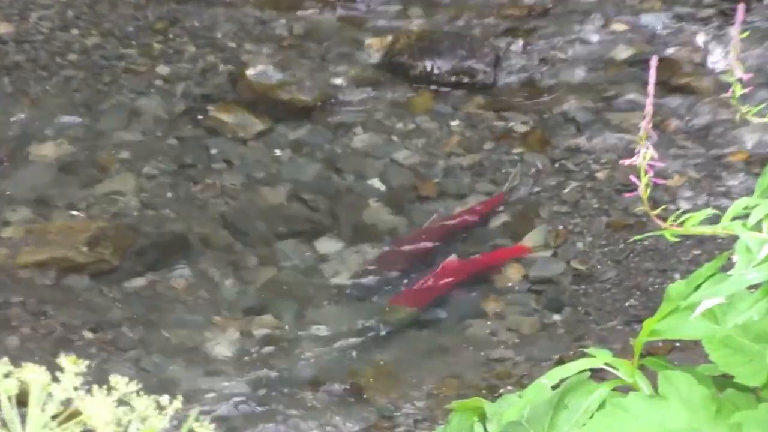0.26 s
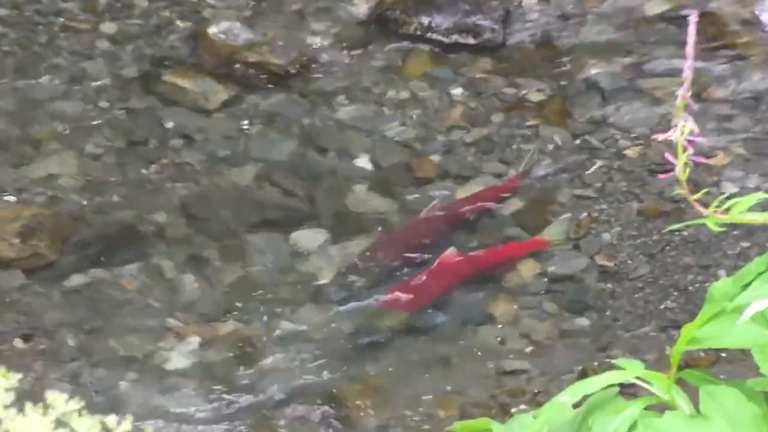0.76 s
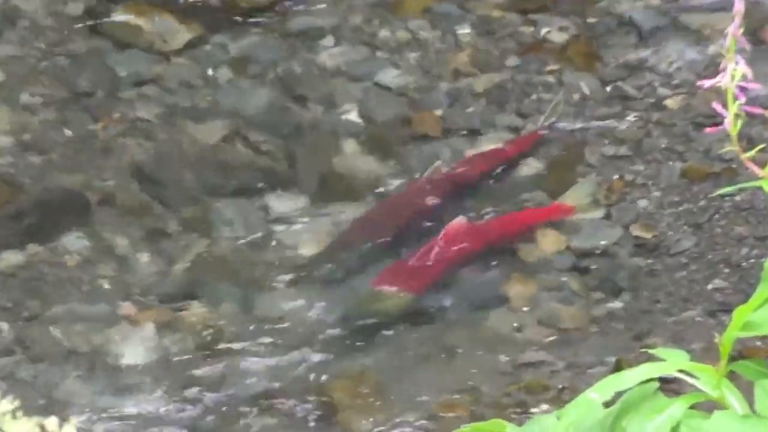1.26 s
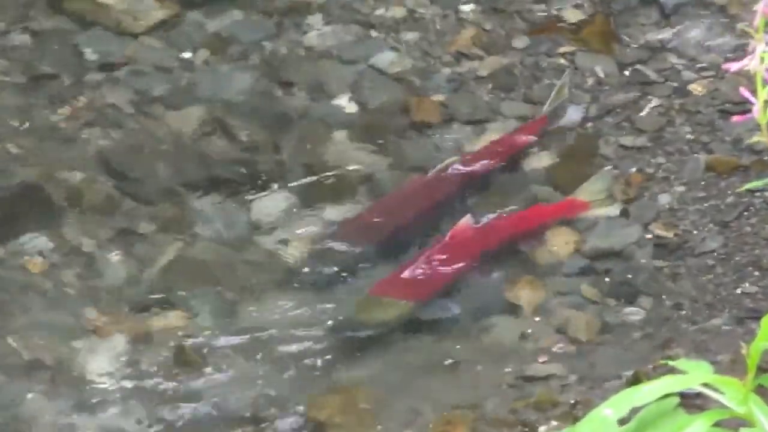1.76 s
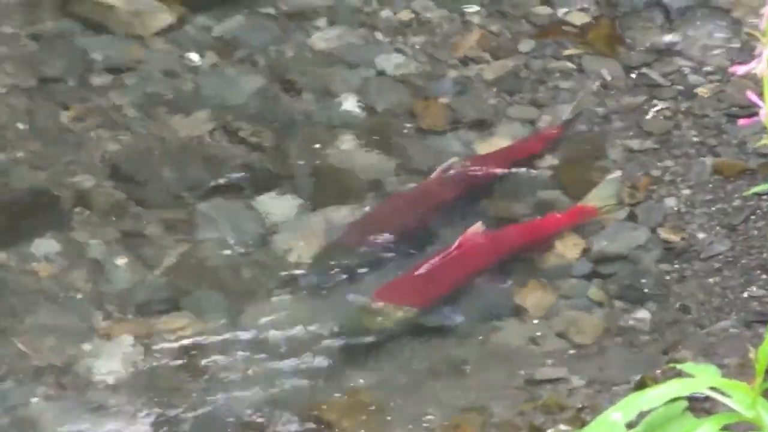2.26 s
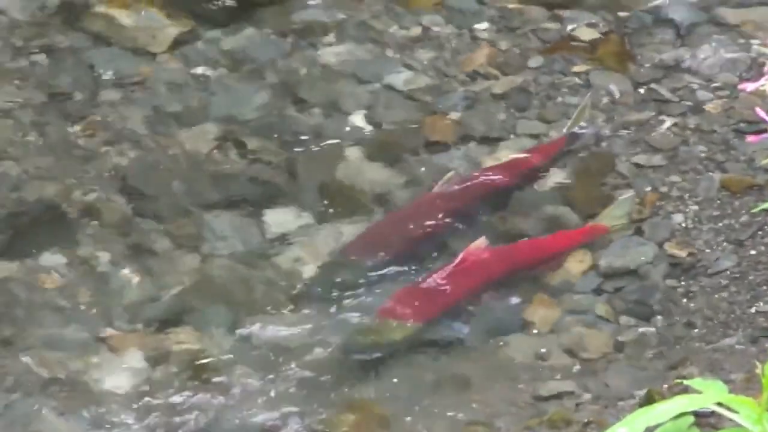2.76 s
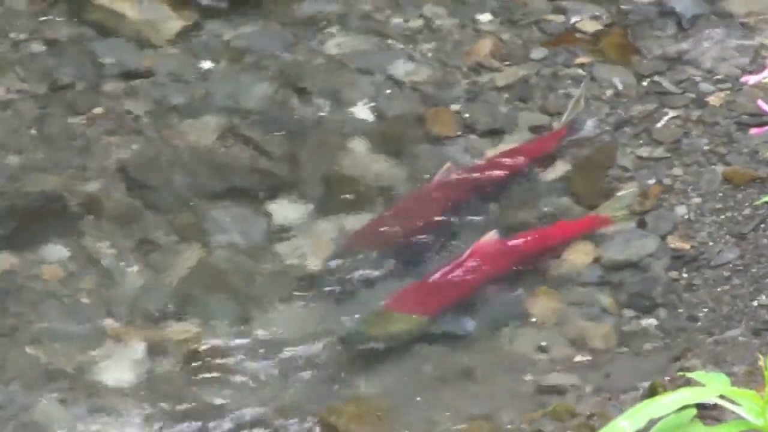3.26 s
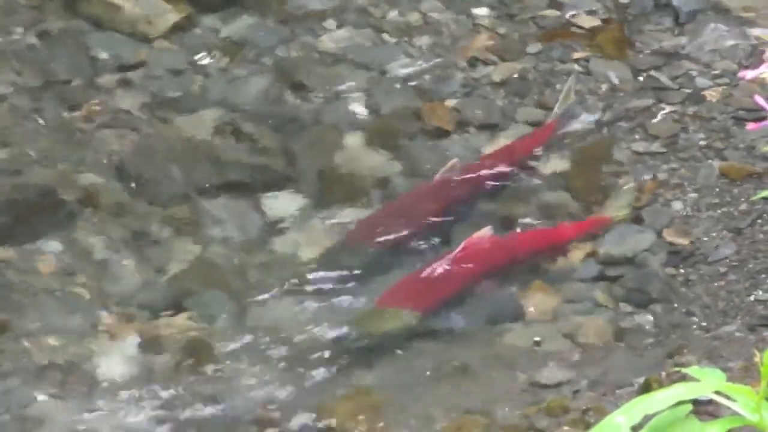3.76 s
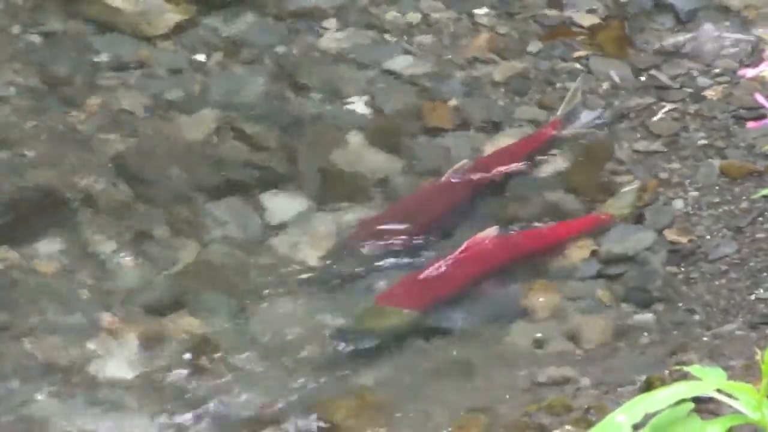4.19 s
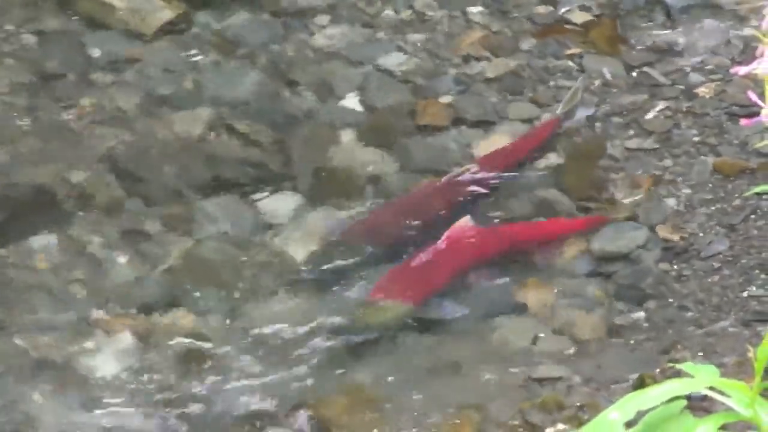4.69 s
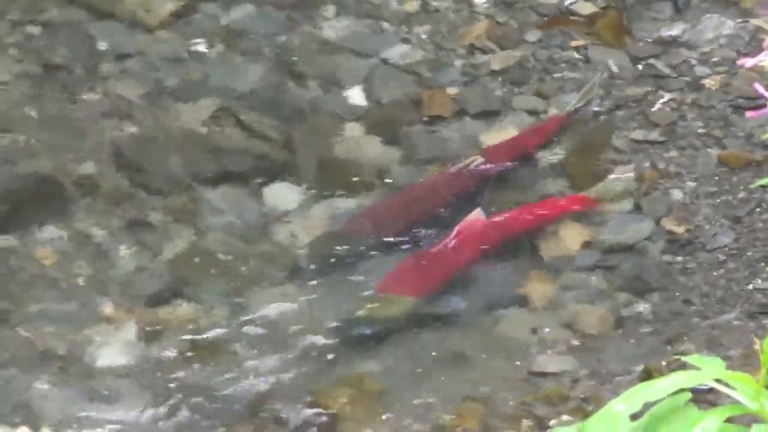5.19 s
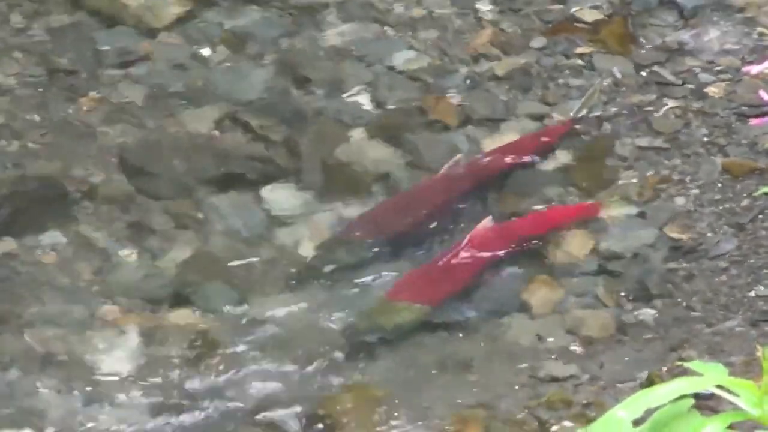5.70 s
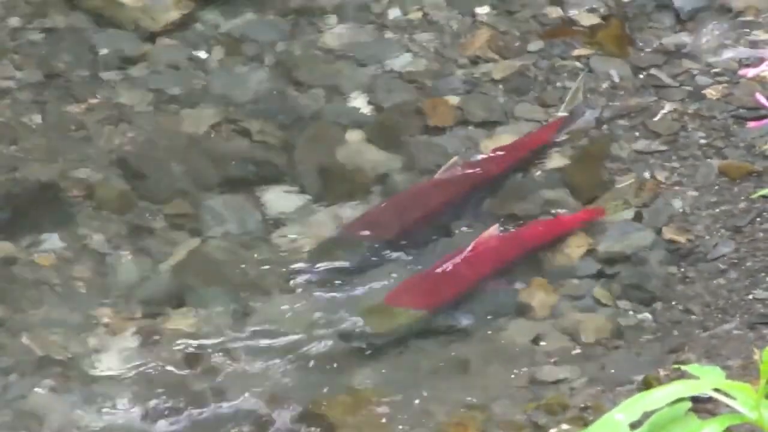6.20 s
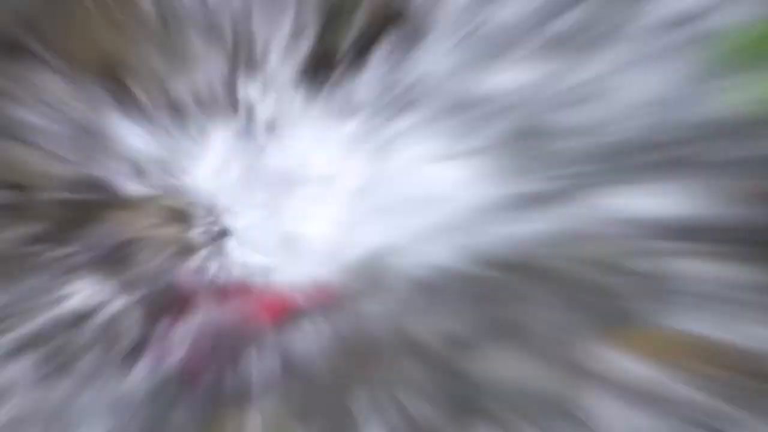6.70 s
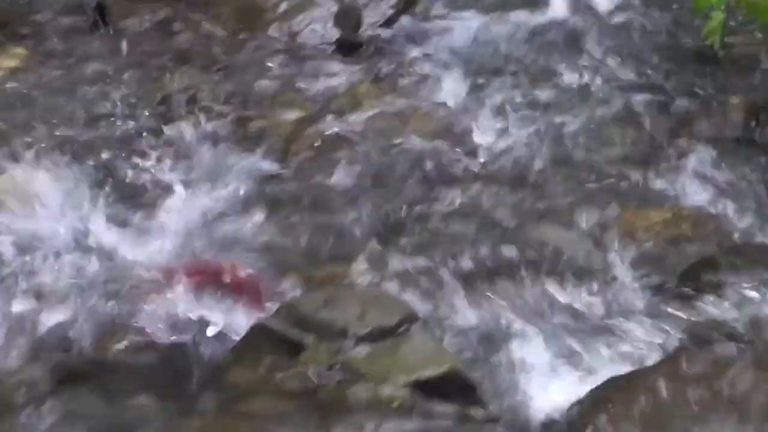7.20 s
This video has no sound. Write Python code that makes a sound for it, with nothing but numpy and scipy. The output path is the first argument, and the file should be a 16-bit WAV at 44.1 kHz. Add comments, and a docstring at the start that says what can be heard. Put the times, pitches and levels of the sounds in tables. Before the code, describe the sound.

From 0 s a shallow creek rushes over stones: a broad, steady mid-range wash with burbling bubbles and a light fizz. Soft, short gulps come irregularly until about 3.3 s, with a few faint drops and a crisper tick near 1.1 s. Faint road noise on the right emerges early and grows gradually, with slight swaying, a blurred tyre hum and a low engine drone. The first vehicle passes at about 5.4 s, its hum sinking in pitch amid rough bursts of roar; the second follows at about 6.2 s with brighter tread hiss, as the traffic sweeps left. Between 6.4 and 6.9 s this blends swiftly into white water, fuller and more churning, without traffic. Close bubbling gulps start around 6.85 s and crowd together from 7.17 s with sharp splashes and spray until the end, about 7.4 s. Wide outdoor stereo, with slightly dulled treble.

```python
"""One first hears a shallow creek over stones; two vehicles approach on a road and their tyre roar swells over it.
The sound then cross-fades to white water in the same creek, with gulps and splashes close by.
Water is turbulent noise plus swarms of ringing bubbles; gulps are runs of air pockets, splashes noise bursts.
Traffic is coloured noise, tyre song and engine drone, shaped by distance and bearing.
Three narrow bands are notched from the treble, and the whole is band-limited."""
import sys
import numpy as np
from scipy import signal
from scipy.fft import rfft, irfft, next_fast_len
from scipy.io import wavfile
from scipy.ndimage import uniform_filter1d, map_coordinates

SR = 44100
rng = np.random.default_rng(int(sys.argv[2]) if len(sys.argv) > 2 else 0)


def master_out(mix):
    """Clip the mix to full scale and print it as 16-bit PCM to the path in sys.argv[1]."""
    frames = np.transpose(np.atleast_2d(mix))
    ceiling = np.clip(frames, -1, 1)
    pcm = np.round(ceiling * 32767).astype(np.int16)
    wavfile.write(sys.argv[1], SR, pcm)


N = 328545  # samples

# Spectra of the two waters: [f/Hz, relative level/dB]
SHALLOWS_SPECTRUM = [(30, -55), (70, -43), (120, -20.5), (180, -8.5), (240, -10.5), (400, -5.5),
                     (780, -1.5), (1400, -3), (2200, -9.5), (3500, -19), (4500, -20), (6000, -17.5),
                     (8500, -22.5), (10300, -28.5), (11300, -40)]
RAPIDS_SPECTRUM = [(30, -49), (90, -41), (180, -13), (240, -13), (340, -5), (820, 0.6), (1100, -3.5),
                   (1550, -2), (2300, -6.5), (3500, -17), (4500, -18), (6500, -16.5), (9500, -22.5),
                   (11300, -32.5)]
# Likeness of left and right: [f/Hz, coherence]
SHALLOWS_COHERENCE = [(60, 0.98), (200, 0.91), (500, 0.97), (900, 0.94), (1600, 0.84), (2500, 0.91),
                      (3300, 0.73), (6000, 0.53), (10800, 0.33)]
RAPIDS_COHERENCE = [(60, .6), (200, .96), (800, .98), (2300, .92), (3300, .72), (6500, 0.63), (10800, .42)]
ROAD_COHERENCE = [(60, 0.95), (200, 1), (700, .99), (1100, 0.95), (1900, 0.94), (3400, 0.61), (6000, 0.37),
                  (9000, 0.22)]
# Phase by which the shallows reach the left first: [f/Hz, phase/rad]
SHALLOWS_LEAD = [(100, -.07), (1100, -.3), (2000, -.06), (6500, .2)]
# Water folding over a stone and trapping a cluster of air pockets:
# [t/s, mid-range f/Hz, level/dB, length/s, range of pitch/octave]
GULP_EVENTS = [(0.567, 675, -32.5, 0.031, 0.33), (1.228, 1090, -36, 0.035, 0.3),
               (1.531, 800, -32.5, .06, 1.43), (1.931, 900, -31.5, 0.028, 1.5), (2.249, 530, -33, .07, 0.4),
               (2.626, 700, -29.5, 0.039, 1.15), (2.826, 860, -30.5, 0.049, 0.31),
               (3.27, 1200, -32, .03, .3), (6.85, 1330, -28, .015, 0.2), (6.955, 1473, -27.5, 0.019, 0.12),
               (7.17, 794, -24.5, .02, 0.35), (7.22, 1164, -28.5, .035, 0.91),
               (7.236, 1660, -29, 0.021, .15), (7.342, 760, -28.5, .035, 0.55),
               (7.356, 1090, -29, 0.027, 0.3), (7.43, 880, -31, 0.021, 0.54)]
# Drops and spray hitting stone: [t/s, level before the band filter/dB, 60 dB decay time/s, upper f/Hz]
SPLASH_EVENTS = [(0.552, -35, .012, 9000), (1.0972, -17.5, 0.0052, 7800), (1.5125, -29, .007, 9000),
                 (1.866, -31, .007, 9000), (1.8906, -32, .007, 9000), (2.7614, -28.5, .03, 4800),
                 (3.9515, -34, .012, 9500), (5.3033, -25, .015, 6505), (7.166, -20.5, 0.017, 10200),
                 (7.173, -24.5, 0.03, 9000), (7.18, -34, 0.18, 9900), (7.235, -35, 0.13, 10000),
                 (7.3305, -26, .009, 10500)]
# Vehicles: [t when level with the listener/s, closest distance/m,
# then peak level/dB of rumble, tyre roar, tread hiss and sizzle, before the sway]
VEHICLES = [(5.399, 12.22, -28.5, -18.5, -31, -40), (6.201, 9.8, -30.5, -45, -21.5, -44)]
# Spectra of the road noise: [f/Hz, relative level/dB]
RUMBLE_SPECTRUM = [(30, -54), (45, -53), (62, -37), (90, -28), (125, -14.5), (170, -3.5), (200, 0.5),
                   (235, -0.5), (285, 4), (420, 3), (800, -21.5), (2000, -68)]
ROAR_SPECTRUM = [(150, -42.5), (300, -13.5), (450, -3), (600, 0.5), (700, 0), (810, 2), (960, -6.5),
                 (1250, -5.5), (2000, -27.5), (2700, -37), (4000, -56)]
TREAD_SPECTRUM = [(100, -71), (400, -40), (800, -9), (950, 6), (1350, 1.5), (1800, -2), (2400, -9.5),
                  (3500, -28.5), (4500, -31), (6300, -32.5), (12000, -67)]
# Air squeezed from the tread, heard only at close range: [f/Hz, relative level/dB]
SIZZLE_SPECTRUM = [(2000, -16), (3400, 3), (4500, -0.5), (6300, 1), (8000, -5), (9500, -9.5), (11500, -35)]
# Gain of the road noise, which emerges, then swells and ebbs: [t/s, rumble level/dB, tyre level/dB]
ROAD_SWAY = [(0, -12, -7), (.5, -2, -2), (1.3, -3, 1), (1.85, -1.5, -0.8), (2.3, 3.5, -0.5),
             (3.05, -2, -0.5), (3.7, 0.5, 1), (4.1, -0.5, -1.3), (4.45, -0.5, 0.5), (4.7, -0.5, -0.2),
             (5.12, 3, 1), (5.38, -1.5, -1), (5.65, -1.5, 0.7), (6.0, -2, 0.5), (6.3, 0, 0),
             (6.55, -3.5, -1.5)]
# Tyre song, one curve each for the leading and following vehicle:
# [t/s, f before the wander/Hz, level before the sway/dB]
TYRE_SONGS = [
    [(0, 779, -48), (2.5, 779.3, -38.5), (4.3, 788.4, -35.5), (4.85, 790, -28), (5.22, 795, -24.5),
     (5.48, 693.5, -25), (5.68, 600, -26.5), (5.95, 571, -31.5), (6.5, 560, -49)],
    [(0, 901, -55), (5.4, 899.5, -35.5), (5.75, 890, -30), (6.1, 871, -26), (6.3, 848, -24),
     (6.5, 870, -23), (6.8, 856, -34)],
]
# Brief surges of the tyre roar: [t/s, centre f/Hz, peak level before the sway/dB, half length/s]
ROAR_SURGES = [(5.19, 800, -21, 0.027), (5.318, 720, -22, .012), (5.55, 562, -20, 0.026),
               (5.71, 1000, -20, 0.023), (5.782, 800, -21, 0.022), (6.312, 820, -20, .025),
               (6.475, 848, -20, 0.019)]
# Bearing of the traffic: [t/s, sine of the angle (-1 right, 1 left)]
TRAFFIC_BEARING = [(0, -0.58), (4.3, -0.64), (5.8, 0.85), (6.5, 0.95)]
# Treble notches, a wide and a narrow one in series for each band: [f/Hz, width/Hz]
TREBLE_NOTCHES = [(3015, 1200), (3020, 130), (4015, 1300), (4020, 220), (5020, 1200), (5030, 450)]

TOP_HZ = 11300  # band limit
SPEED_M_PER_S, SOUND_M_PER_S = 18.1, 343  # of the vehicles and of sound
FIRING_HZ = 89  # leading vehicle's engine, before Doppler shift and wander
SONG_WANDER = .028  # share by which an uneven road bends the tyres' pitch
POCKET_CYCLES = 7.3  # cycles in which an air pocket's ring decays by exp(-2)
CROSSFADE_START_S, CROSSFADE_LENGTH_S = 6.423, 0.44


def shallows():
    """Turbulence and bubble resonance: a wash, deep and light bubbles surging separately, and a fine fizz."""
    wash = turbulence(patchy_db=0.84)
    burble_gain = amp(-14.5 + 1.5 * wobble(11))
    burble = burble_gain * bubbles(190, 385.0, 908.5, cycles=19.0, spread_db=0.5, size=1600)
    babble_gain = amp(-15.0 + 1.4 * wobble(14))
    babble = babble_gain * bubbles(480, 854, 2310, cycles=16.0, spread_db=1.0, size=900)
    fizz_gain = amp(-9.0 + 0.91 * wobble(11))
    fizz = fizz_gain * bubbles(1500, 3100, 10850, cycles=22, spread_db=0.5, size=240)
    mix = wash + burble + babble + fizz
    water = amp(-33.5) * spread(mix, SHALLOWS_SPECTRUM, SHALLOWS_COHERENCE)
    opposite = np.array([[1], [-1]])  # left leads by half the phase, right lags by half
    return filtered(water, lambda hz: np.exp(.5j * along(SHALLOWS_LEAD, hz) * opposite))


def rapids():
    """Air entrainment: white water churns air into many more bubbles, with spray above on the same surge."""
    wash = turbulence(patchy_db=0.5)
    surge_db = wobble(13)
    churn = amp(-13.5 + surge_db) * bubbles(900, 447, 2234, cycles=10.7, spread_db=1.2, size=700)
    spray = amp(-7.0 + surge_db) * bubbles(3000, 3040, 10400, cycles=5, spread_db=2.3, size=120)
    return amp(-28.0) * spread(wash + churn + spray, RAPIDS_SPECTRUM, RAPIDS_COHERENCE)


def gulps(count=12):
    """Cavity resonance: each plunge sheds a quick run of air pockets, in any order of size, gliding upward."""
    out, t = np.zeros(N), np.arange(SR // 6) / SR
    for start_s, hz, db, length_s, octaves in GULP_EVENTS:
        jitter = rng.random((count, 1))
        pitch = rng.permutation(np.linspace(0, 1, count))[:, None]
        born_s = length_s * (np.arange(count)[:, None] + jitter) / count
        pocket_hz = hz * 2 ** (octaves * (pitch - .5))
        turns = pocket_hz * np.maximum(t - born_s, 0)
        cluster = np.sum(ringing(turns, POCKET_CYCLES, glide=0.015), axis=0)
        length_gain = np.sqrt(length_s / t[-1])  # shorter clusters carry less energy
        add(out, start_s, amp(db) * length_gain * unit(cluster))
    # small pockets radiate no bass
    return signal.sosfilt(signal.butter(2, 400, "high", fs=SR, output="sos"), out)


def splashes():
    """Impact noise: flung drops land in short decaying bursts; the bigger the drop, the lower its upper limit."""
    out, t = np.zeros((2, N)), np.arange(SR // 8) / SR
    for start_s, db, decay_s, top_hz in SPLASH_EVENTS:
        shared = np.sign(rng.standard_normal(len(t)))
        burst = shared + 0.5 * rng.standard_normal((2, len(t)))
        band = signal.butter(2, [3300, top_hz], "band", fs=SR, output="sos")
        add(out, start_s, signal.sosfilt(band, amp(db - 60 * t / decay_s) * burst))
    return out


def traffic():
    """Spreading loss: rumble, roar and tread hiss fade with range, the tread hiss least of all; sizzle trails
    each vehicle."""
    rumble_db, roar_db, tread_db, sizzle_db = np.transpose(VEHICLES)[2:6]
    rumble_sway, tyre_sway = amp(curves(ROAD_SWAY))

    rumble_noise = spread(turbulence(patchy_db=0.5), RUMBLE_SPECTRUM, ROAD_COHERENCE)
    rumble = swell(rumble_db, falloff=1.11, late_s=-0.1) * (rumble_noise + amp(-19) * engine())

    roar_noise = spread(turbulence(patchy_db=0.86), ROAR_SPECTRUM, ROAD_COHERENCE)
    roar = swell(roar_db, falloff=1.13, late_s=0.04) * roar_noise

    tread_noise = spread(turbulence(patchy_db=0.55), TREAD_SPECTRUM, ROAD_COHERENCE)
    tread = swell(tread_db, falloff=0.92, late_s=-0.039) * tread_noise

    sizzle_noise = spread(turbulence(patchy_db=1.5), SIZZLE_SPECTRUM, ROAD_COHERENCE)
    sizzle = swell(sizzle_db, falloff=1.6, late_s=0.54) * sizzle_noise

    body = roar + sizzle + tyre_song(width_hz=61) + surges(width_hz=166)
    tyres = from_road(body, shade_db=.5) + from_road(tread, shade_db=3.0)
    return rumble_sway * from_road(rumble, shade_db=.5) + tyre_sway * tyres


def tyre_song(width_hz):
    """Periodic impact: tread blocks strike at a blurred rate, a noise band that sinks as a vehicle passes."""
    song = np.zeros(N)
    for hz, db in map(curves, TYRE_SONGS):
        wandering_hz = hz * (1 + SONG_WANDER * wobble(4))
        song += amp(db) * narrow_noise(wandering_hz, width_hz)
    return song


def surges(width_hz):
    """Amplitude modulation: Gaussian envelopes gather the close tyre roar into brief, rough clumps."""
    t, out = np.arange(N) / SR, np.zeros(N)
    for peak_s, hz, db, half_s in ROAR_SURGES:
        envelope = np.exp(-.5 * ((t - peak_s) / half_s) ** 2)
        out += amp(db) * envelope * narrow_noise(hz, width_hz)
    return out


def engine():
    """Doppler shift: an unsteady firing drone and its stronger octave drop as the leading vehicle passes."""
    pass_s, distance_m = VEHICLES[0][:2]
    firing_hz = FIRING_HZ * drive_by(pass_s, distance_m)[1]
    phase = 2 * np.pi * np.cumsum(firing_hz * (1 + 0.0303 * wobble(9))) / SR
    fundamental = amp(-12.5 + 2 * wobble(7.2)) * np.sin(phase)
    octave = amp(0.9 * wobble(7.3)) * np.sin(2 * phase)
    return unit(fundamental + octave)


def swell(peaks_db, falloff, late_s=0):
    """Distance law: gain falls as a power of range, peaking late or early for backward or forward radiation."""
    gains = []
    for (pass_s, distance_m, *_), db in zip(VEHICLES, peaks_db):
        nearness = drive_by(pass_s + late_s, distance_m)[0]
        gains.append(amp(db) * nearness ** falloff)
    return np.linalg.norm(gains, axis=0)  # the vehicles' powers add


def drive_by(pass_s, distance_m):
    """Straight-line motion: nearness (1 when level with the listener) and Doppler factor of a vehicle."""
    road_m = SPEED_M_PER_S * (np.arange(N) / SR - pass_s)
    range_m = np.hypot(road_m, distance_m)
    doppler = 1 / (1 + SPEED_M_PER_S / SOUND_M_PER_S * road_m / range_m)
    return distance_m / range_m, doppler


def from_road(pair, shade_db):
    """Interaural difference: the nearer side hears the traffic a little earlier and louder."""
    bearing, = curves(TRAFFIC_BEARING)
    half_lead = 7e-5 * bearing * SR / 2  # samples, from a full lead of 70 microseconds
    left = map_coordinates(pair[0], [np.arange(N) + half_lead], mode="mirror")
    right = map_coordinates(pair[1], [np.arange(N) - half_lead], mode="mirror")
    return np.array([left, right]) * amp(shade_db * np.array([bearing, -bearing]) / 2)


def turbulence(patchy_db, streak_db=1.5):
    """Random flow: two unrelated white noises whose gain wanders in broad patches and narrow streaks of pitch."""
    z = signal.stft(rng.standard_normal((2, N)), nperseg=2048)[2]
    broad, narrow = rng.standard_normal((2, *z.shape[1:]))
    broad = uniform_filter1d(uniform_filter1d(broad, size=28, axis=0), size=3, axis=1)
    narrow = uniform_filter1d(uniform_filter1d(narrow, size=3, axis=0), size=6, axis=1)
    gain = amp(patchy_db * unit(broad) + streak_db * unit(narrow))
    return unit(signal.istft(z * gain, nperseg=2048)[1][:, :N])


def bubbles(per_second, low_hz, high_hz, cycles, spread_db, size):
    """Bubble resonance: two unrelated swarms, each bubble rising in pitch as it nears the surface."""
    count = int(per_second * N / SR)
    when, pitch, chance, angle = rng.random((count, 4)).T[:, :, None]
    hz = low_hz * (high_hz / low_hz) ** pitch
    ring = ringing(hz * np.arange(size) / SR, cycles, glide=0.041)
    strength = amp(-spread_db * np.log(np.maximum(chance, .01))) * hz
    at = ((when * N).astype(int) + np.arange(size)).ravel()
    swarms = []
    for side in (np.cos(2 * np.pi * angle), np.sin(2 * np.pi * angle)):
        swarms.append(np.bincount(at, (ring * strength * side).ravel(), N)[:N])
    return unit(np.array(swarms))


def ringing(turns, cycles, glide):
    """Damped oscillation: a soft onset, a rising pitch and a decay by exp(-2) over the given cycles."""
    age = turns / cycles
    tone = np.sin(2 * np.pi * turns * (1 + glide * np.minimum(age, 2)))
    return tone * np.exp(-2 * age) * (1 - np.exp(-2 * turns))


def narrow_noise(centre_hz, width_hz):
    """Quadrature modulation: low-passed noise carried to a fixed or moving pitch, rms 1."""
    phase = 2 * np.pi * np.cumsum(centre_hz * np.ones(N)) / SR
    a, b = filtered(rng.standard_normal((2, N)), lambda hz: 1 / (1 + (hz / width_hz) ** 4))
    return unit(a * np.cos(phase) + b * np.sin(phase))


def spread(pair, spectrum, coherence):
    """Stereo coherence: two unrelated signals are coloured and blended into left and right, rms 1."""
    def mid_side(hz):
        turn = np.arccos(np.clip(along(coherence, hz), -1, 1)) / 2
        return amp(along(spectrum, hz)) * [np.cos(turn), np.sin(turn)]

    mid, side = filtered(pair, mid_side)
    return unit(np.array([mid + side, mid - side]))


def wobble(per_second):
    """Interpolation: a smooth random curve of about unit size through random knots."""
    knots = rng.standard_normal(400)
    return map_coordinates(knots, [np.arange(N) * per_second / SR], mode="mirror")


def amp(db):
    """Logarithmic level: decibels to amplitude gain."""
    return 10 ** (np.asarray(db) / 20)


def unit(x):
    """Normalisation: x at rms 1."""
    return x / np.sqrt(np.mean(x ** 2) + 1e-20)


def along(points, hz):
    """Logarithmic pitch: (f/Hz, value) points interpolated on a log axis."""
    f, v = np.transpose(points)
    return np.interp(np.log(hz + 1), np.log(f), v)


def curves(rows):
    """Linear interpolation: one value per sample for each column after the time."""
    s, *cols = np.transpose(rows)
    return [np.interp(np.arange(N) / SR, s, c) for c in cols]


def filtered(x, response):
    """Linear filtering: the spectrum of x times a response of frequency."""
    m = next_fast_len(N + SR // 2)
    return irfft(rfft(x, m) * response(np.fft.rfftfreq(m, 1 / SR)), m)[..., :N]


def add(track, start_s, sound):
    """Superposition: mix a short sound into a track, in place."""
    part = track[..., round(start_s * SR):][..., :sound.shape[-1]]
    part += sound[..., :part.shape[-1]]


def scene():
    """Superposition: shallows and traffic cross-fade to rapids; gulps and splashes lie over both."""
    fade = np.clip((np.arange(N) / SR - CROSSFADE_START_S) / CROSSFADE_LENGTH_S, 0, 1)
    roadside = (1 - fade) ** 1.36 * (shallows() + traffic())
    white_water = fade ** 0.65 * rapids()
    return roadside + white_water + gulps() + splashes()


def record(dry):
    """Band rejection: three treble bands are notched and nothing is kept from the band limit up."""
    def response(hz):
        gain = hz < TOP_HZ
        for centre, width in TREBLE_NOTCHES:
            reject = centre * centre - hz * hz
            gain = gain * reject / (reject + 1j * hz * width)
        return gain

    return filtered(dry, response)


dry = scene()
out = record(dry)
master_out(out)
```